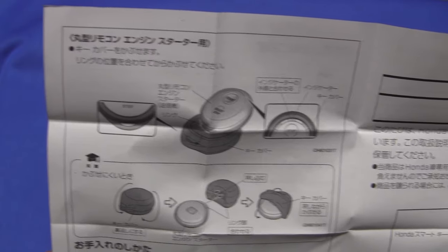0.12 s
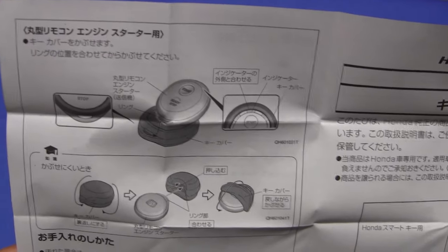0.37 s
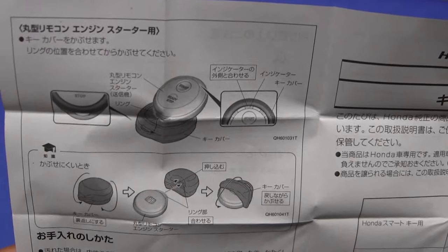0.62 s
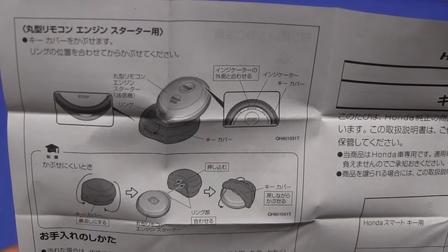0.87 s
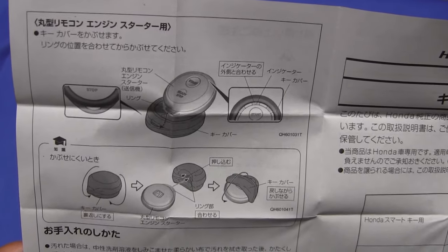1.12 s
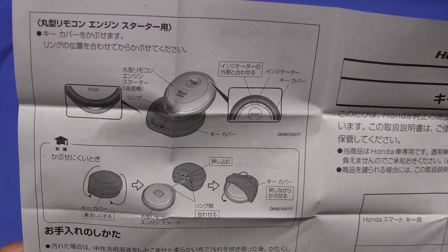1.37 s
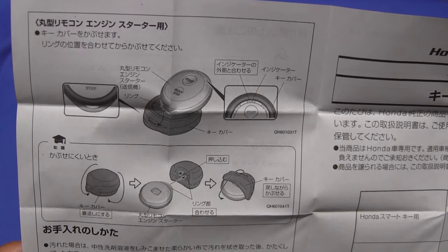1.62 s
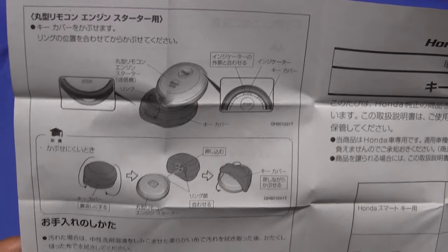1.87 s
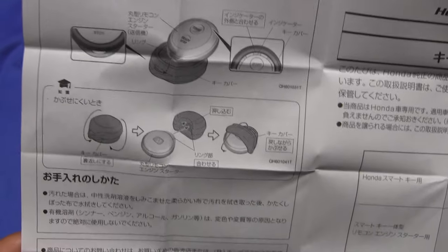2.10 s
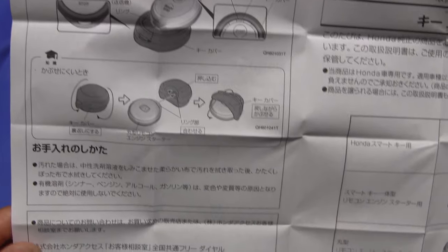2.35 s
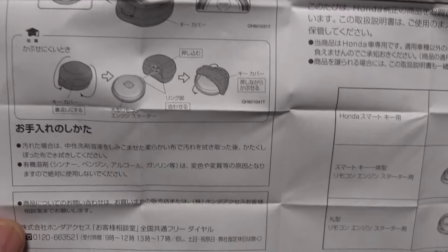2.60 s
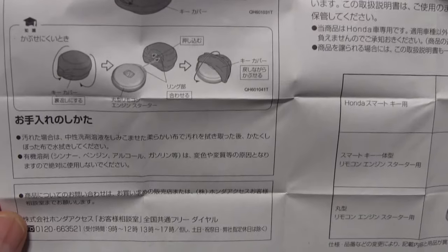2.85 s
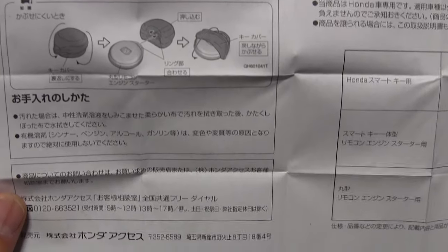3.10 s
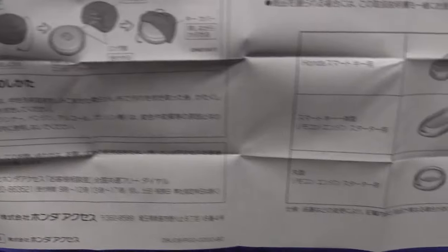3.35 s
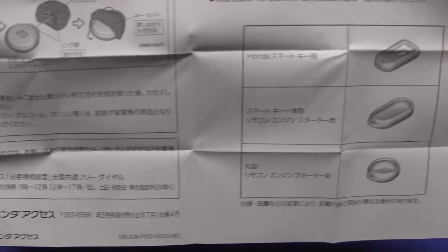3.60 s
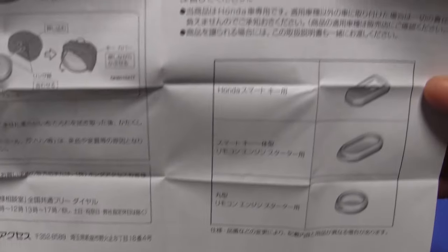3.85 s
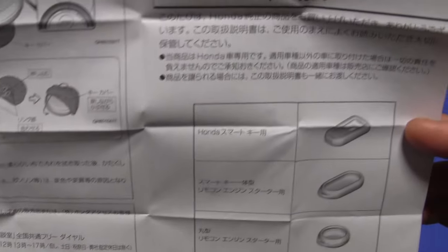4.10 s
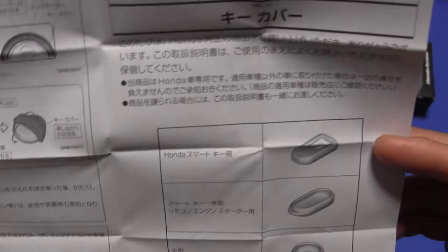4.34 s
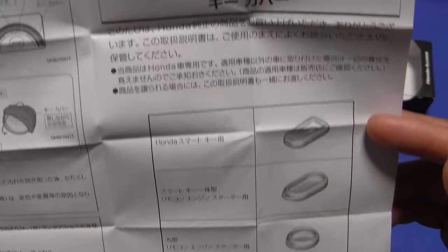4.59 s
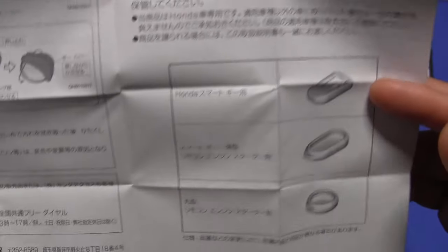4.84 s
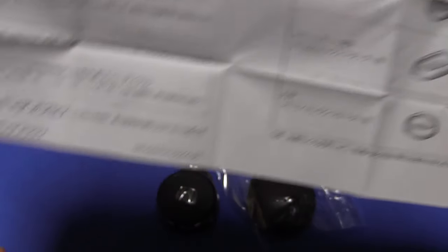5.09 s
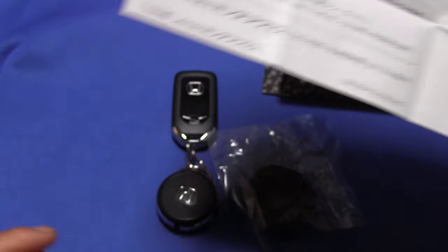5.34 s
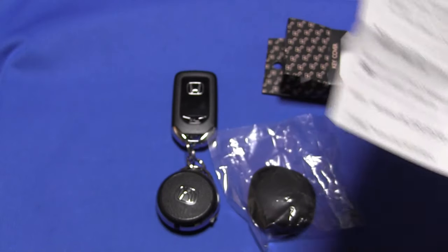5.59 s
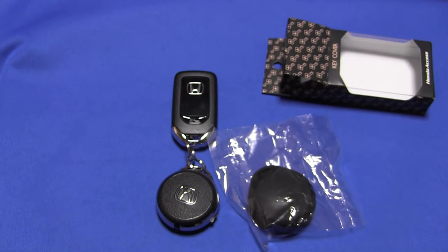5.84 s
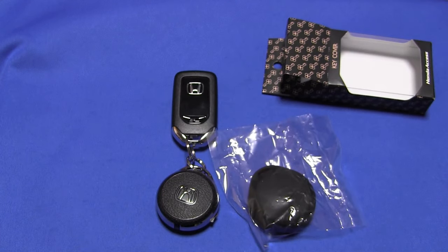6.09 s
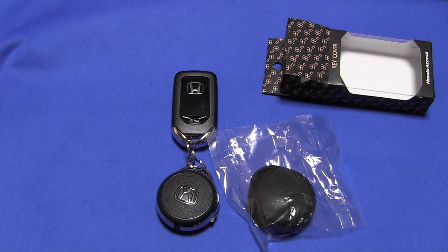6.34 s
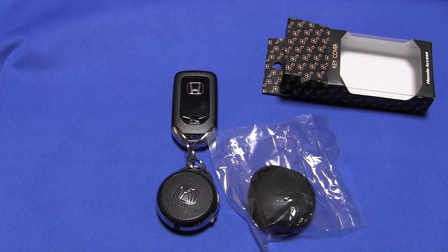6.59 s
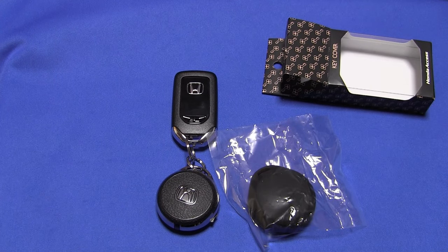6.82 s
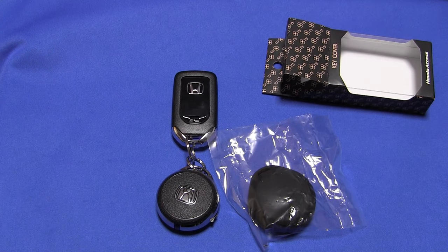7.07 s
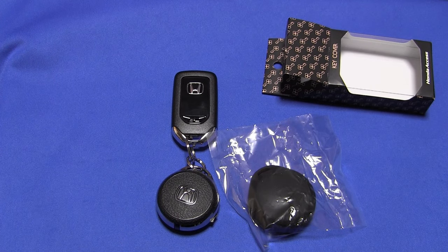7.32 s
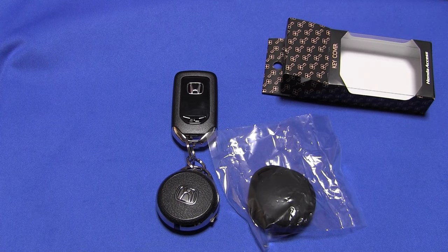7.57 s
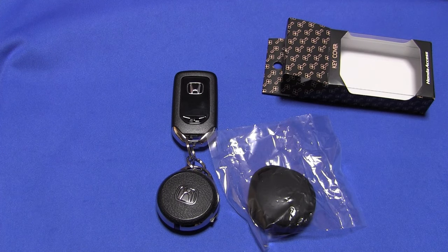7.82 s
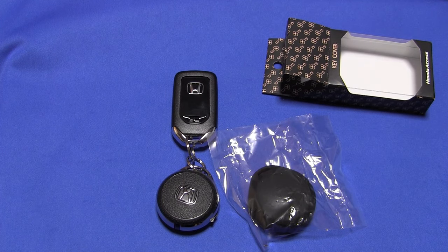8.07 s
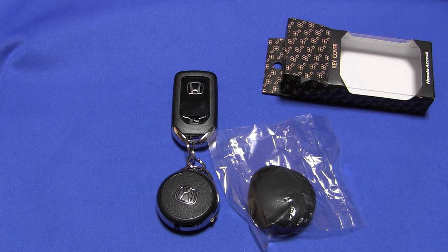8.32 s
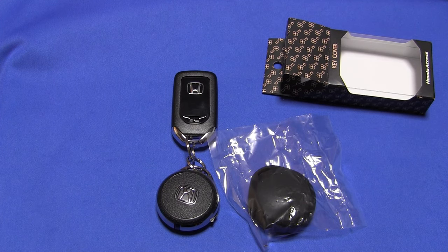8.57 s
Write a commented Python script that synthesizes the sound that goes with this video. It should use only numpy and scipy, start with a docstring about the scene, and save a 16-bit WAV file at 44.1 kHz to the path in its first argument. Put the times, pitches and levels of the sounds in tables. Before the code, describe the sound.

A creased sheet of paper is handled close to two microphones in a small, soft, quiet room. Sparse dry snaps come first, with faint short slides between them. A sharp burst of crackling and rustling comes around five seconds, then a busier cluster near seven as the sheet is laid down and pressed. After that only soft room hiss remains, with a barely audible far engine hum and one tiny tick.

```python
"""In a small, soft, quiet room a creased sheet of paper is shifted in the hands close to two microphones.
Over steady room tone with faint hums, its creases buckle with dry snaps: dying shivers of noise ring the sheet.
From about one second it also slides in short strokes, a fine hiss of grains over a lower body.
Later it moves to the right, is laid down and briefly pressed flat, so that trapped air colours its sounds.
Meanwhile a far engine, two wavering sine tones, comes up and slowly gains speed; a tiny high tick falls near the end."""
import sys
import numpy as np
from scipy import signal
from scipy.fft import rfft, irfft, next_fast_len
from scipy.io import wavfile
from scipy.ndimage import uniform_filter1d, map_coordinates

SR = 44100
rng = np.random.default_rng(int(sys.argv[2]) if len(sys.argv) > 2 else 0)


def boost(x):
    """Linear amplitude factor 10**(x/20) for a level x in decibels (scalar or array-like)."""
    u = np.asarray(x, float) / 20
    return 10 ** u


def materialize(psi):
    """Save the field psi as 16-bit PCM at rate SR to the path in sys.argv[1].

    A 1-D psi becomes a single channel; in a 2-D psi each row is a channel.
    """
    bounded = np.clip(np.atleast_2d(psi).T, -1, 1)
    quanta = np.round(bounded * 32767).astype(np.int16)
    wavfile.write(sys.argv[1], SR, quanta)


N = 383229


def unit(x):
    """Scaled to rms 1."""
    return x / np.sqrt(np.mean(x ** 2) + 1e-20)


def along(points, hz):
    """(Hz, value) points read on a log frequency axis."""
    f, v = np.transpose(points)
    return np.interp(np.log(hz + 1), np.log(f + 1), v)


def curves(rows):
    """One value per sample for each column after the time."""
    s, *cols = np.transpose(rows)
    return [np.interp(np.arange(N) / SR, s, c) for c in cols]


def wobble(rate):
    """A smooth random curve, rate knots a second."""
    knots = rng.standard_normal(int(N * rate / SR) + 4)
    return map_coordinates(knots, [np.arange(N) * rate / SR])


def filtered(x, response):
    """x passed through a complex response of frequency."""
    n = x.shape[-1]
    m = next_fast_len(n + 8192)
    return irfft(rfft(x, m) * response(np.fft.rfftfreq(m, 1 / SR)), m)[..., :n]


def causal(gain):
    """The response with this gain that starts at once and rings only afterwards (minimum phase)."""
    cepstrum = irfft(np.log(gain + 1e-6))
    half = len(cepstrum) // 2
    cepstrum[1:half] *= 2
    cepstrum[half + 1:] = 0
    return np.exp(rfft(cepstrum))


def peak(f, hz, width_hz):
    """The complex response of one resonance."""
    return 1j * f * width_hz / (hz * hz - f * f + 1j * f * width_hz)


def room_tone():
    """Soft steady noise, partly shared by both microphones, with a few unsteady hums of narrow-band noise."""
    # colour of room tone and microphone hiss: hz, relative level_db (per Hz)
    air_colour = [(15, -43), (25, -16.5), (116, -11.5), (144, -4.5), (233, -6.5), (289, -4), (411, -8.5),
                  (470, -4.5), (567, -9), (685, -6.5), (784, -9.5), (2300, -14.5), (2850, -17.5),
                  (4050, -19.5), (15500, -34)]
    # likeness of the left and right microphones: hz, correlation
    likeness = [(60, 0.85), (180, 0.73), (550, 0.45), (1650, 0.69), (4970, 0.62), (15000, 0.13)]
    # slow drift of the room tone: start_s, level_db
    air_level = [(0, -60.5), (1.2, -60), (2.2, -59.5), (3.5, -60), (5.6, -60.5), (7.3, -59.5)]
    # hums in the room: pitch_hz, width_hz, level_db
    hums = [(488.5, 5.5, -80), (284, 22, -89.5), (4075, 150, -81.5)]

    def mid_side_colour(f):
        turn = np.arccos(np.clip(along(likeness, f), -1, 1)) / 2
        return boost(along(air_colour, f)) * [np.cos(turn), np.sin(turn)]

    mid, side = filtered(rng.standard_normal((2, N)), mid_side_colour)
    level_db = curves(air_level)[0] + 0.39 * wobble(7.8)
    tone = boost(level_db) * unit(np.array([mid + side, mid - side]))
    for hz, width_hz, db in hums:
        tone = tone + boost(db) * unit(filtered(rng.standard_normal(N), lambda f: peak(f, hz, width_hz)))
    return tone


def snaps():
    """A crease flips and sets off a dying shiver of smaller flips; the panel rings briefly, flaps air and cracks."""
    # creases buckling: start_s, ring_db over the first 8 ms, ring_hz, flap_db re ring, fall_db of the shiver in 10 ms
    buckles = [(0.204, -41.5, 2240, -5.5, 24), (0.699, -63, 410, 4, 6), (1.035, -59, 410, -6, 12),
               (1.094, -58, 390, 9, 11), (1.767, -57.5, 855, -14, 17), (2.192, -30.5, 2700, -13.5, 13.5),
               (2.286, -26.5, 2300, -21, 28.5), (2.817, -51, 577, 0, 12), (2.87, -49, 830, -6, 35),
               (2.982, -50.5, 417, 4.5, 7), (3.014, -61, 900, 5.5, 9), (3.268, -28, 2210, -11.5, 18),
               (3.687, -50, 770, -1, 13), (4.25, -54.5, 1390, -2.5, 29), (4.665, -60, 1920, -3, 2.5),
               (4.824, -45.5, 2650, -3.5, 13), (4.901, -39.5, 467, -13, 31), (4.911, -38, 557, -1, 29),
               (4.921, -45, 520, 1, 4.5), (4.953, -26, 1790, -29, 28), (4.983, -38, 1300, -2, 6),
               (5.078, -37, 1920, -14, 16), (5.284, -49.5, 1720, 6, 3), (5.295, -35.5, 1200, 0.5, 21),
               (5.946, -52, 1290, -14, 23), (6.213, -39.5, 2030, -18, 13), (6.253, -47, 604, -9, 24),
               (6.345, -41.5, 1530, -3.5, 12.5), (6.43, -47, 1330, -3.5, 13), (6.484, -54, 960, -16, 15),
               (6.513, -44.5, 1500, -3, 11), (6.732, -46.5, 2470, -4.5, 18), (6.768, -44, 645, -3, 11),
               (6.873, -46.5, 1290, -45, 11), (6.914, -28.5, 2670, -36, 13), (6.961, -28, 1450, -44, 26),
               (6.996, -39, 2650, -24, 17), (7.068, -49, 1330, -15, 11), (7.113, -52, 1890, -12, 14),
               (7.123, -39.5, 2480, -39, 15), (7.148, -42, 2310, -8.5, 15), (7.19, -47, 2130, -3.5, 7.5),
               (7.529, -52, 1470, -13, 7), (7.662, -50.5, 1720, -16, 8), (7.71, -54.5, 3230, -33, 18)]
    # colour of a snap: hz, relative level_db (per Hz)
    snap_colour = [(180, -28.5), (300, -1), (1310, 2.5), (2110, 2), (2710, -0.5), (3220, 1.5),
                   (4590, -11.5), (5520, -13), (7000, -22), (9100, -56), (15400, -120)]
    laid_down_s = 5.6
    out, t = np.zeros(N + SR), np.arange(SR // 4) / SR

    def blow(x):
        """Scaled to rms 1 over the first 8 ms."""
        return x / x[:round(.008 * SR)].std()

    for s, ring_db, ring_hz, flap_db, fall_db in buckles:
        crack_db = -26.5 - 0.46 * flap_db  # re ring: the more a panel flaps, the less it cracks
        up = 1.41 if s > laid_down_s else 1  # lying on the table it flaps in smaller, higher panels

        luck = rng.standard_normal((2, len(t)))
        fade = boost(-abs(fall_db) * t / .01)
        settle = boost(-22.5 - 380 * t)  # the sheet goes on trembling faintly
        onset = 1 - np.exp(-(t / 0.0014) ** 2)
        shiver = luck[0] * boost(1.3 * luck[1]) * (fade + settle) * onset
        shiver[40] += boost(6.0 + 0.36 * fall_db)  # a clean quick flip is mostly one crack

        def ring_response(f):
            first = peak(f, ring_hz, 0.14 * ring_hz)
            second = peak(f, 2.17 * ring_hz, 0.21 * ring_hz)
            modes = abs(0.63 + first - 0.95 * second)
            dull = 1 / (1 + (f / (2.26 * ring_hz)) ** 2)  # large panels flip slowly
            return causal(boost(along(snap_colour, f)) * modes * dull)

        def flap_response(f):
            g = f / up
            return peak(g, 348, 200) * peak(g, 217, 290) * peak(g, 212, 420)

        def crack_response(f):
            return peak(f, 4650, 6800) ** 2 / (1 + (f / 9500) ** 4)

        ring = filtered(shiver, ring_response)
        flap = filtered(shiver * boost(-700 * t), flap_response)
        crack = filtered(shiver * boost(-1500 * t), crack_response)
        sound = blow(ring) + boost(flap_db) * blow(flap) + boost(crack_db) * blow(crack)
        out[round(s * SR):][:len(t)] += boost(ring_db) * sound
    return out[:N]


def room(x):
    """The walls answer; each frequency dies at its own speed and the echo pattern shifts as the sheet moves."""
    # decay of the small room: hz, t60_s
    decay = [(200, 0.61), (1500, 0.044), (5000, 0.067), (12000, 0.28)]
    out, step = np.zeros((2, N + 2 * SR)), SR // 4  # a fresh echo pattern every quarter second
    for start in range(0, N, step):
        hz, t, z = signal.stft(rng.standard_normal((2, SR // 3)), SR, nperseg=256)
        fall = boost(-60 * t / along(decay, hz)[:, None])
        tail = signal.istft(z * fall, SR, nperseg=256)[1]
        tail = tail / np.linalg.norm(tail[0])
        wet = signal.fftconvolve(x[None, start:start + step], tail, axes=1)
        out[:, start + 180:][:, :wet.shape[1]] += wet  # the first echo is 180 samples late
    return out[:, :N]


def patches(depth_db):
    """Two noises whose energy gathers in short narrow patches, as the bending sheet changes its resonances."""
    z = signal.stft(rng.standard_normal((2, N)), nperseg=256)[2]
    field = uniform_filter1d(rng.standard_normal(z.shape[1:]), size=3, axis=0)  # across frequency
    field = uniform_filter1d(field, size=5, axis=1)  # along time
    return signal.istft(z * boost(depth_db * unit(field)), nperseg=256)[1][:, :N]


def strokes():
    """Gain of hiss and body: each stroke sets in, glides from its first level to its last and lets go."""
    # paper on skin, paper and cloth: start_s, length_s, first hiss_db, last hiss_db, body_db re hiss at its loudest
    rubs = [(1.051, .06, -54.5, -71, 1.5), (1.221, 0.017, -69.5, -73.5, 14.5), (1.873, 0.14, -77, -60.5, 5),
            (2.016, 0.059, -59, -63.5, -1), (2.104, 0.056, -66.5, -56.5, 1.5), (2.202, 0.043, -64, -74, 15),
            (2.424, 0.11, -66, -81, 5.5), (3.511, .012, -62.5, -64.5, 4.5), (4.784, .03, -67.5, -81, 10.5),
            (4.824, 0.092, -54, -62, 1.5), (4.923, 0.034, -67, -58, -6), (4.984, 0.088, -48, -53.5, 2.5),
            (5.3, 0.043, -64.5, -65.5, 8), (5.53, 0.12, -67, -81, 6), (5.677, .06, -68, -72.5, 7),
            (5.796, 0.055, -61.5, -84, -3), (5.93, 0.062, -68.5, -69, 5.5), (6.072, .03, -64, -74, 5),
            (6.107, 0.085, -74, -64, 4), (6.222, 0.12, -64.5, -68, 6), (6.437, 0.057, -69, -65.5, 11),
            (6.513, 0.085, -52, -64.5, 1.5), (6.614, 0.059, -56.5, -54.5, -9),
            (6.684, 0.062, -53.5, -65.5, 2), (6.742, 0.066, -67.5, -77, 16.5), (6.884, .025, -54, -62, 1),
            (6.92, 0.029, -46.5, -49, 7), (6.974, 0.051, -48.5, -64, 6.5), (7.026, 0.084, -64, -51.5, -4.5),
            (7.129, 0.026, -56, -48.5, 4), (7.177, .12, -58, -75, 3.5), (7.318, 0.013, -63, -68, 5),
            (7.374, .012, -63.5, -67, 7), (7.648, 0.075, -73, -62, -2), (7.722, 0.034, -62.5, -67, 3.5)]
    attack_db_per_s, release_db_per_s = 652, 600
    body_follows = 0.88  # the body swings less than the hiss within a stroke
    power, t = np.zeros((2, N)), np.arange(N) / SR
    for s, length, first_db, last_db, body_db in rubs:
        span = slice(round((s - .1) * SR), round((s + length + .1) * SR))
        u = t[span] - s
        edges_db = attack_db_per_s * np.minimum(u, 0) - release_db_per_s * np.maximum(u - length, 0)
        top_db = max(first_db, last_db)
        glide_db = np.interp(u, [0, length], [first_db, last_db]) - top_db
        hiss_db = top_db + glide_db + edges_db
        low_db = top_db + body_db + body_follows * glide_db + edges_db
        power[:, span] += boost([hiss_db, low_db]) ** 2
    return uniform_filter1d(np.sqrt(power), size=200, axis=1)


def slides():
    """Fibres catch and let go in clumps of tiny grains all over the sheet, which adds a lower body."""
    # colour of the fine hiss: hz, relative level_db (per Hz)
    hiss_colour = [(1470, -11), (2500, -1), (3300, -3.5), (4760, -4.5), (5250, -7.5), (5790, -4.5),
                   (10000, -10), (15000, -23.5)]
    # colour of the sliding sheet as a sounding board: hz, relative level_db (per Hz)
    body_colour = [(120, -34), (200, -9), (504, 0.5), (680, -4), (1290, -3), (1410, -3), (1530, -2),
                   (1640, -7), (1790, -1.5), (3250, -8.5), (4640, -14.5), (6000, -18.5), (7800, -28),
                   (13200, -120)]

    def grains():
        spikes_db = 5.1 * rng.standard_normal(N)
        clumps_db = 1.6 * wobble(70) + 1.6 * wobble(300)
        return patches(depth_db=1.5) * boost(spikes_db + clumps_db)

    def coloured(colour):
        """Mid and side grains, their powers adding up to 1; the treble comes from a wide area."""
        wide = lambda f: np.array([np.ones_like(f), 0.2 * f / (f + 5000)])
        return unit(filtered(grains(), lambda f: boost(along(colour, f)) * wide(f))) * np.sqrt(.5)

    hiss_gain, body_gain = strokes()
    return hiss_gain * coloured(hiss_colour) + body_gain * coloured(body_colour)


def engine():
    """Only two low orders of the far engine's shaft come through the wall, as wavering sines."""
    # the far engine: start_s, shaft_hz, level_db
    shaft = [(5.8, 36.9, -84), (6.2, 37.5, -73), (6.8, 38.0, -70), (7.3, 38.5, -68), (7.9, 39.2, -66),
             (8.2, 39.35, -68), (8.35, 39.4, -72), (8.5, 39.45, -70), (8.69, 39.4, -69)]
    # tones heard: multiple of shaft_hz, level_db re the engine
    orders = [(5, -6), (6, 0.5)]
    shaft_hz, db = curves(shaft)
    turns = np.cumsum(shaft_hz) / SR
    tones = np.zeros(N)
    for k, order_db in orders:
        sine = np.sqrt(2) * np.sin(2 * np.pi * k * turns)  # rms 1
        tones += boost(order_db + wobble(6.4)) * sine
    return boost(db) * tones


def pressed(x):
    """While the sheet is pressed down, its sounds take on the resonances of the air under it."""
    # the sheet is pressed flat: start_s, end_s
    start_s, end_s = (6.86, 7.3)
    # air trapped under it rings: pitch_hz, width_hz, level_db before the overall gain
    pockets = [(1365, 290, -1), (3000, 900, -6), (480, 200, -10.5)]
    t = np.arange(N) / SR
    down = uniform_filter1d(((t > start_s) & (t < end_s)) * 1., size=400)

    def pocket(f):
        resonances = sum(boost(db) * abs(peak(f, hz, w)) ** 2 for hz, w, db in pockets)
        return causal(boost(-4.5) + resonances)  # -4.5 dB passes between the resonances

    return (1 - down) * x + boost(2) * filtered(down * x, pocket)


def tick():
    """A very short high rasp: resonant noise that starts at once and dies exponentially."""
    # a tiny high tick: start_s, pitch_hz, level_db (the rms starts 3.5 dB lower), t60_s
    s, hz, db, t60 = (8.119, 8600, -53, .02)
    t = np.arange(N) / SR - s
    burst = unit(filtered(rng.standard_normal(N), lambda f: peak(f, hz, 1500) ** 2))
    return (t > 0) * boost(db - 3.5 - 60 * abs(t) / t60) * burst


def scene():
    """The sheet near the microphones, its room, and the background."""
    # where the sheet is: start_s, place (0 in front to 1 at the right)
    sideways = [(0, 0.66), (4.5, 0.028), (5.2, 0.58), (6, 1), (7.8, 0.56)]
    # with the sheet at the right: hz, left minus right level_db
    shadow = [(300, 0.5), (2000, -1), (8000, -4), (15000, -8)]

    def lean_response(f):
        level = np.tanh(np.log(boost(along(shadow, f))) / 2)
        lag = 0.36 * f / (f + 1500)
        return level - 1j * lag

    mid, side = slides()
    mid = pressed(mid + snaps()) + tick()
    lean = filtered(mid, lean_response)
    side = side + curves(sideways)[0] * lean  # the far microphone hears it later and duller
    sheet = np.array([mid + side, mid - side])
    return sheet + boost(-18) * room(mid) + room_tone() + engine()


def band_limit(x):
    """A steep low-pass at the top of the band."""
    return signal.sosfilt(signal.butter(12, 15690, fs=SR, output="sos"), x)


def record(dry):
    """The microphones' signal loses the deepest bass and everything above a band limit."""
    top_hz, bass_hz = 15690, 34
    mix = filtered(dry, lambda f: (f < top_hz) / (1 + (bass_hz / (f + 1)) ** 6))
    return band_limit(mix)


dry = scene()
out = record(dry)
materialize(out)
```